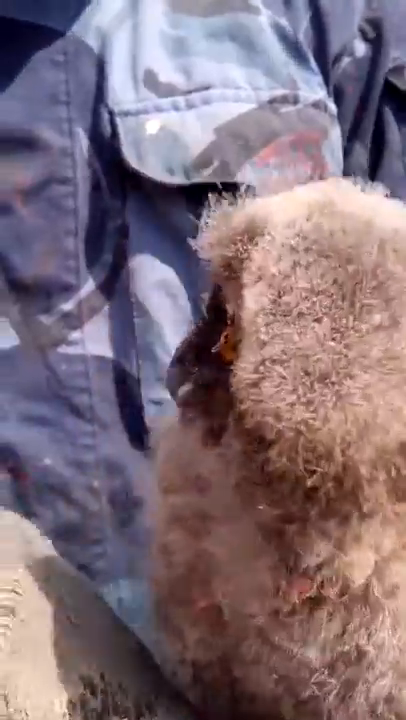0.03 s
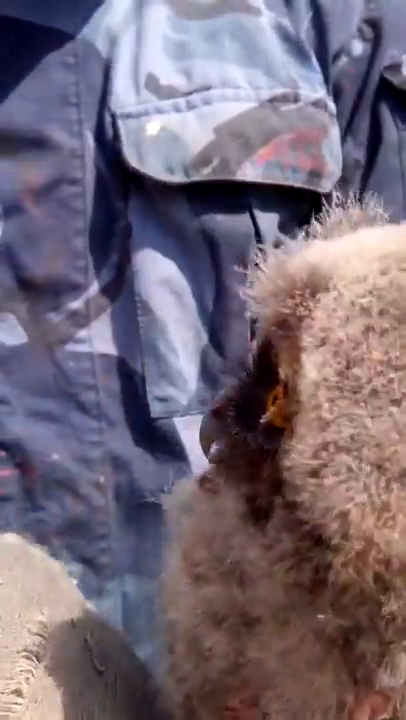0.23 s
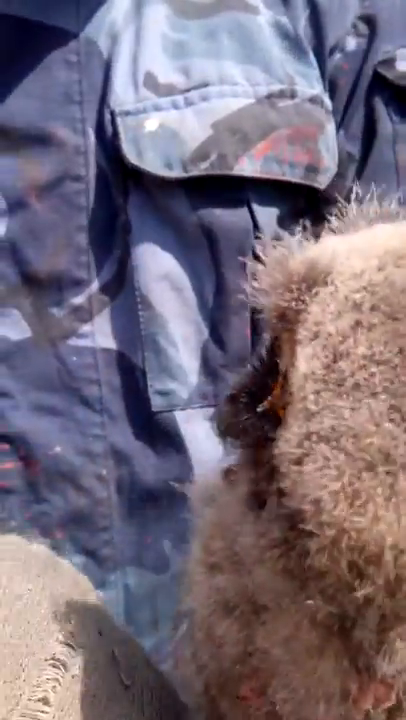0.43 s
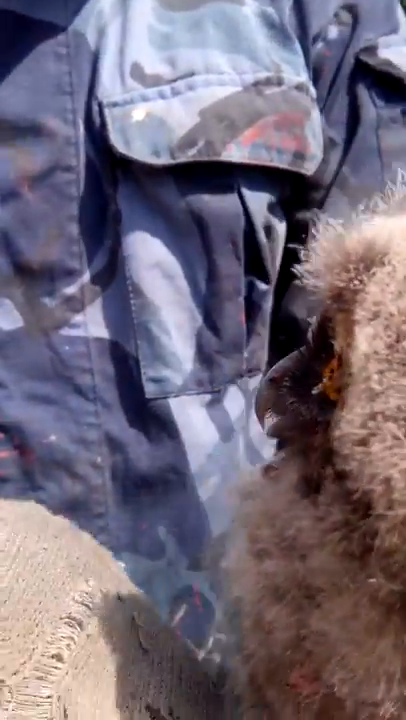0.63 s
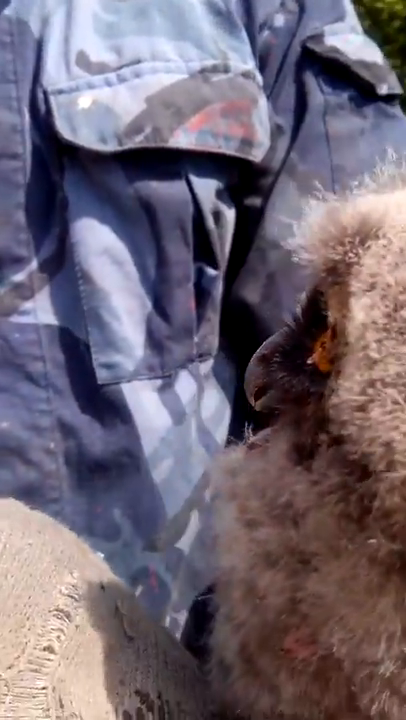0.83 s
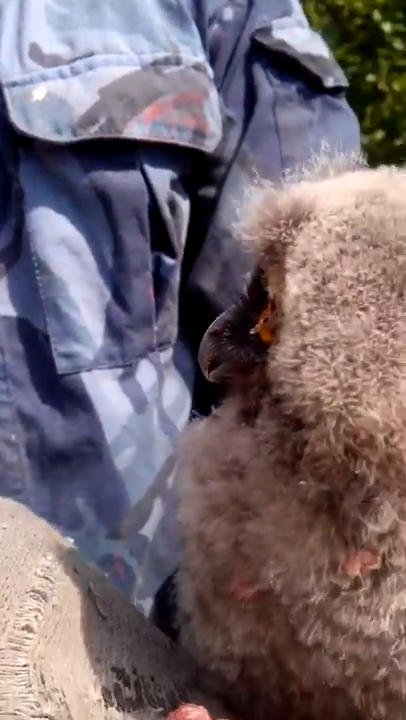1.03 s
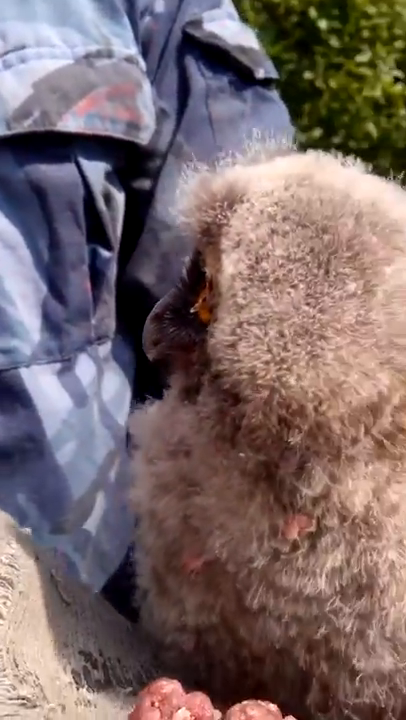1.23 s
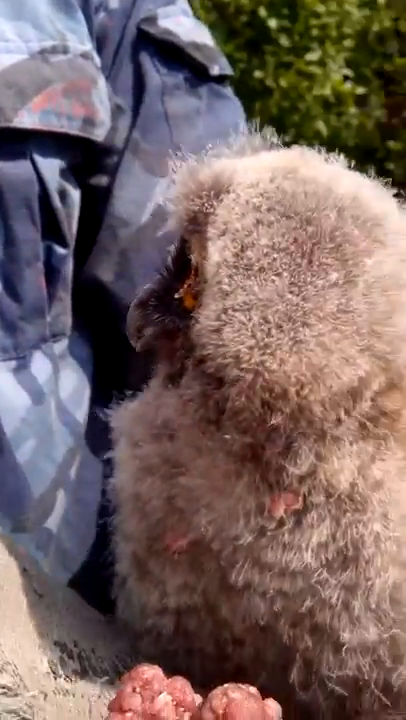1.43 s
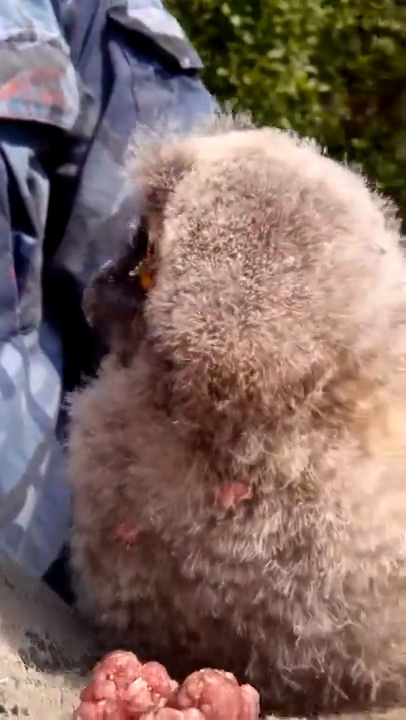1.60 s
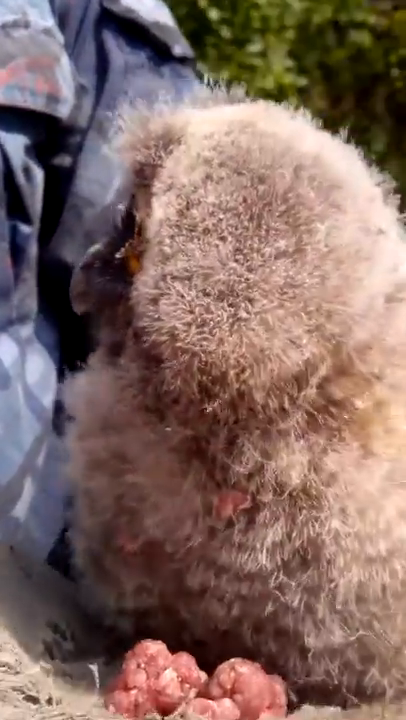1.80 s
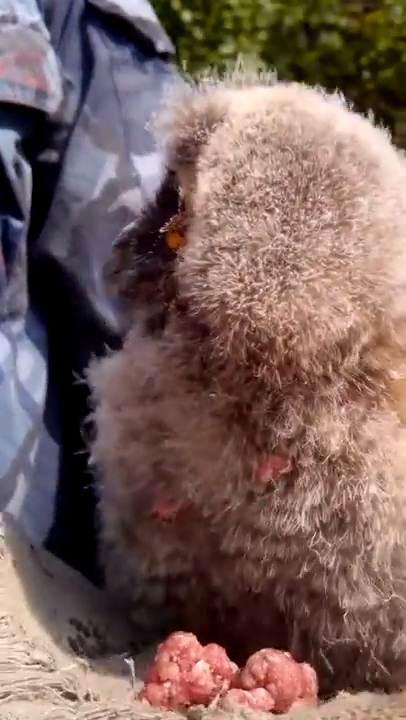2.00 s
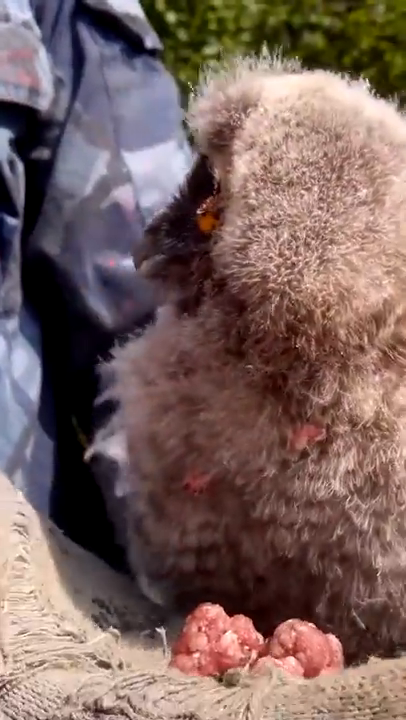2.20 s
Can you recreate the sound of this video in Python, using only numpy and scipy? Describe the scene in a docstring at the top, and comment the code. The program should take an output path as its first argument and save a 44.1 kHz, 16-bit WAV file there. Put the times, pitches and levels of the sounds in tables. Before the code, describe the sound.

An owl chick snaps its bill six times, sharp and close, over faint hiss.

```python
"""Sharp clicks, close by and a little to the left: an owl chick claps its bill six times.
Four claps come in a row, the fourth soft and dull; after a pause come two more. The two halves
of the bill strike, bounce and ring for about a millisecond, and each clap echoes off the keeper's
jacket, the ground and the garden. Behind them are a steady hiss, a low fluttering hum and one soft bump."""
import sys
import numpy as np
from scipy import signal
from scipy.fft import rfft, irfft
from scipy.io import wavfile

SR = 44100
rng = np.random.default_rng(int(sys.argv[2]) if len(sys.argv) > 2 else 0)


def digitize_waveform(pressure):
    """Quantize a signal to 16-bit integers and store it at the path in sys.argv[1].

    Rows of a 2-D input are taken as channels; values are limited to [-1, 1].
    """
    field = np.atleast_2d(pressure).T
    bounded = np.clip(field, -1, 1)
    quanta = np.round(bounded * 32767).astype(np.int16)
    wavfile.write(sys.argv[1], SR, quanta)


N = 103635


def bill_claps():
    """The halves of the bill strike and bounce; the jacket sends each clap back a moment later."""
    # One row per clap: start_s, strength_db, pitch_ratio, brightness_hz, middle_tone_db,
    # bounce_ms, bounce_share, jacket_ms, jacket_share
    clap_list = [ (0.2438, 3.5, 1, 4400, -0.5, 0.25, 0.13, 1.154, 0.43),
                 (0.3988, 1.33, 0.94, 9100, -3, 0.7, 0.21, 1.28, 0.29),
                 (0.5595, 2.1, 0.94, 6350, 1, 0.677, 0.2, 1.483, 0.44),
                 (0.7322, 4.5, 0.96, 800, -4, 0.63, 0.36, 1.42, 0.31),
                 (1.8855, 2.46, 1.032, 4460, 3.5, 0.83, 0.1, 1.405, 0.45),
                 (2.0513, 3.5, 1.04, 2860, 5, 0.32, 0.17, 1.37, 0.48), ]
    # How much duller the bill sounds on the right: pitch_hz, gain_db
    far_side = [(1000, -5), (2500, -5.5), (4500, -18), (7000, -12)]
    claps = 0
    for (start_s, strength_db, pitch_ratio, brightness_hz, middle_tone_db,
         bounce_ms, bounce_share, jacket_ms, jacket_share) in clap_list:
        strike = undb(strength_db) * delay(1000 * start_s) * lowpass(brightness_hz)
        with_bounce = strike * (1 + bounce_share * delay(bounce_ms))
        ringing = with_bounce * bill_ring(pitch_ratio, middle_tone_db)
        claps = claps + ringing * (1 + jacket_share * delay(jacket_ms))
    left = claps * highpass(hz=741)  # a small bill gives off little bass
    right = left * undb(over_hz(far_side)) * delay(ms=0.056)
    return irfft(np.array([left, right]) * garden_echoes(), N)


def bill_ring(pitch_ratio, middle_tone_db):
    """The bill rings with several tones; how strong the middle one is depends on where the tips meet."""
    # Ringing tones of the bill and mouth: pitch_hz, width_hz, gain_db
    tones = [(969, 235, 10), (1550, 816, 7.5), (2512, 504, 15.5), (3415, 330, 12), (4660, 760, 17.5),
             (6110, 1880, 8.5)]
    middle = len(tones) // 2
    ring = 0
    for k, (pitch_hz, width_hz, gain_db) in enumerate(tones):
        gain = undb(gain_db + middle_tone_db * (k == middle))
        direction = (-1) ** k  # neighbouring tones swing opposite ways
        ring = ring + direction * gain * resonance(pitch_hz * pitch_ratio, width_hz)
    return ring


def garden_echoes():
    """Sound reaches each ear directly, as a dull bounce off the ground and as a fading wash of echoes."""
    # Echoes off feathers and clothes, nearby ground, garden: start_ms, fade_s (to fall 60 dB), gain_db
    echoes = [(1.6, 0.0096, -15), (6, 0.029, -29.5), (18, 0.41, -35.5)]
    t = np.arange(N) / SR
    ground = undb(-18) * delay(ms=8.1) * lowpass(hz=1980)
    paths = 1 + ground
    for start_ms, fade_s, gain_db in echoes:
        tail = rng.standard_normal((2, N)) * np.exp(-np.log(1000) * t / fade_s)
        tail /= np.linalg.norm(tail, axis=1, keepdims=True)
        paths = paths + undb(gain_db) * delay(start_ms) * rfft(tail)
    return paths


def hiss():
    """Steady noise: the bass is alike in both ears, the treble wide and stronger on the left."""
    # Tone colour of the noise: pitch_hz, gain_db
    colour = [(15, -60), (25, -12.5), (37, -24.5), (51, -7.5), (70, -1.5), (92, -3), (206, -8), (245, -11),
              (400, -11), (524, -18.5), (991, -21.5), (1430, -23.5), (4320, -19.5), (7230, -24),
              (8800, -39), (11400, -85), (19400, -120)]
    # How alike the two ears are: pitch_hz, likeness (1 the same, -1 opposite)
    ear_likeness = [(120, 0.81), (300, 0.45), (1000, 0.23), (2070, 0.57), (4200, -0.37), (8000, -0.9)]
    # How much louder the left is than the right: pitch_hz, difference_db
    left_lean = [(180, -0.5), (310, 4), (540, 3.5), (1640, 2.5), (2840, 6.5), (4920, 6), (8500, 1)]
    # Slow drift in loudness: time_s, gain_db
    swell = [(0, 1), (.6, -1), (1.1, -1), (1.9, -0.5), (2.3, 1.5)]
    shared, opposed = rfft(rng.standard_normal((2, N)))
    ears = np.array([[1], [-1]])  # left, right
    likeness = over_hz(ear_likeness)
    noise = np.sqrt(1 + likeness) * shared + ears * np.sqrt(1 - likeness) * opposed
    noise /= np.sqrt(1 + np.maximum(likeness, -.5))
    noise *= undb(over_hz(colour) + ears * over_hz(left_lean) / 2)
    gain = undb(-61 + over_time(swell)) / irfft(noise.mean(axis=0), N).std()
    bass_cut = undb(-4.5 * abs(lowpass(hz=347)))
    return gain * irfft(noise * bass_cut, N)


def fluttering_hum(rate_hz=69.87, jitter_share=0.168, spread_db=5.5, count=400):
    """A faint low hum made of soft pulses, uneven in timing and size."""
    # Loudness of the hum: time_s, level_db
    loudness = [(0, -67), (.45, -61.5), (.65, -64), (1.03, -69), (1.19, -61), (1.36, -66.5), (2.3, -63.5)]
    timing, size = rng.standard_normal((2, count))
    starts = ((np.arange(count) + jitter_share * timing) / rate_hz * SR).astype(int)
    inside = (starts >= 0) & (starts < N)
    pulses = np.bincount(starts[inside], undb(spread_db * size[inside]), N)
    hum = irfft(rfft(pulses) * lowpass(hz=232) * highpass(hz=12), N)
    return -hum / hum.std() * undb(over_time(loudness))


def bump(peak_s=.293, pitch_hz=67.7, width_s=.011, level_db=-41.5):
    """One soft, low bump, as of a hand shifting its grip."""
    t = np.arange(N) / SR - peak_s
    return undb(level_db) * np.exp(-(t / width_s) ** 2) * np.cos(2 * np.pi * pitch_hz * t)


def undb(db):
    """Turn decibels into a number to multiply by."""
    return 10 ** (np.asarray(db) / 20)


def freqs():
    """Every frequency in the spectrum, in Hz."""
    return np.arange(N // 2 + 1) * SR / N


def over_hz(points):
    """Join (pitch_hz, value) points into a curve, with octaves evenly spaced."""
    hz, value = np.array(points, float).T
    return np.interp(np.log(freqs() + 1), np.log(hz), value)


def over_time(points):
    """Join (time_s, value) points with straight lines."""
    return np.interp(np.arange(N) / SR, *np.array(points, float).T)


def delay(ms):
    """Multiply a spectrum by this to make the sound come later."""
    return np.exp(-2j * np.pi * freqs() * ms / 1000)


def lowpass(hz):
    """A filter that gently turns down the treble."""
    return 1 / (1 + 1j * freqs() / hz) ** 2


def highpass(hz):
    """A filter that gently turns down the bass."""
    return (1j * freqs() / (hz + 1j * freqs())) ** 2


def resonance(hz, width_hz):
    """A filter that rings at one pitch; the wider it is, the sooner it fades."""
    f = freqs()
    return 1j * f * width_hz / (hz ** 2 - f ** 2 + 1j * f * width_hz)


def scene():
    """Bill claps over the background."""
    return bill_claps() + hiss() + fluttering_hum() + bump()


def record(dry, top_hz=8500):
    """Cut away the highest treble steeply."""
    return signal.sosfiltfilt(signal.butter(14, top_hz, fs=SR, output="sos"), dry)


dry = scene()
out = record(dry)
digitize_waveform(out)
```